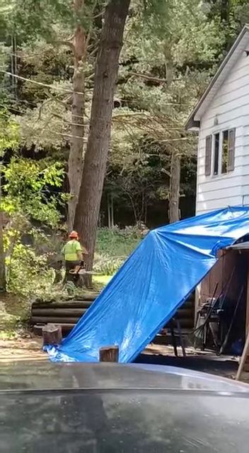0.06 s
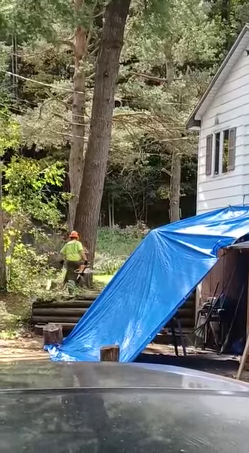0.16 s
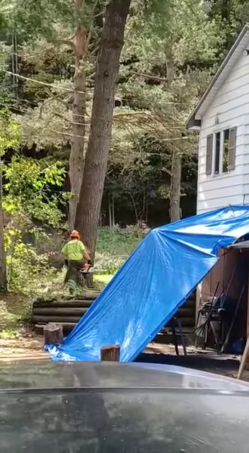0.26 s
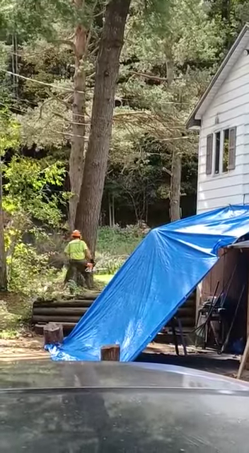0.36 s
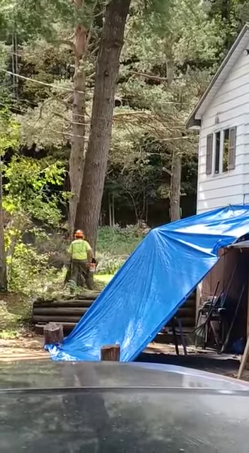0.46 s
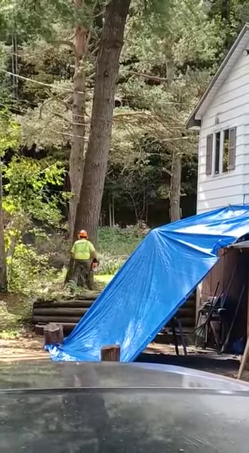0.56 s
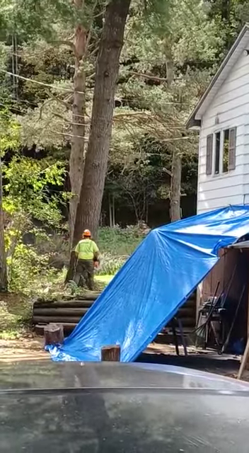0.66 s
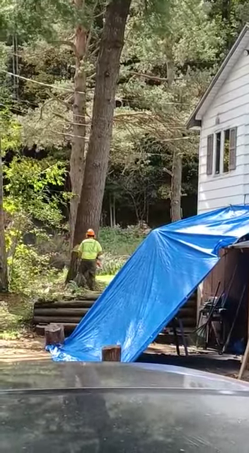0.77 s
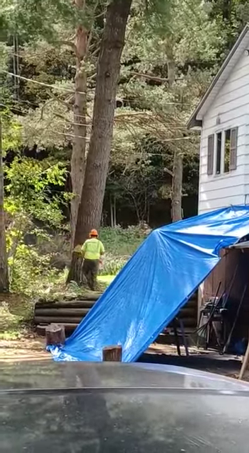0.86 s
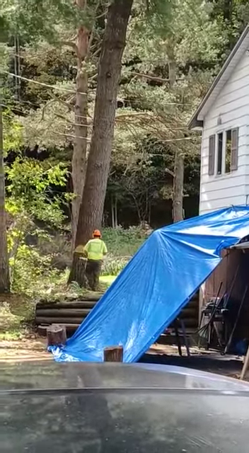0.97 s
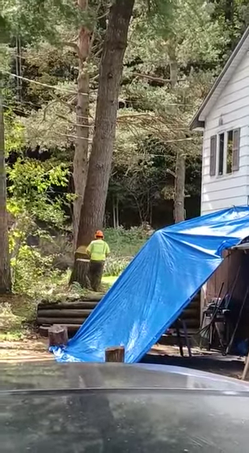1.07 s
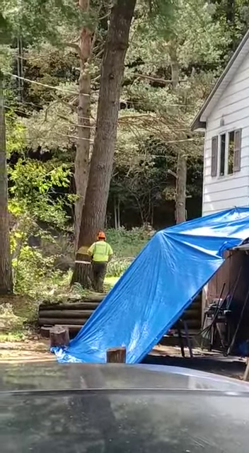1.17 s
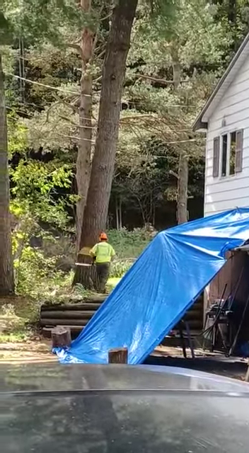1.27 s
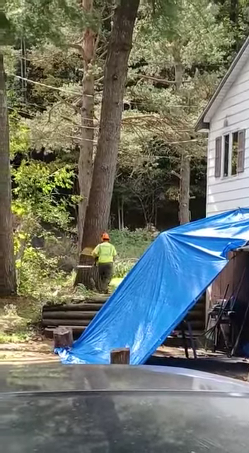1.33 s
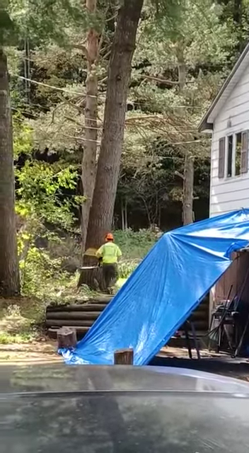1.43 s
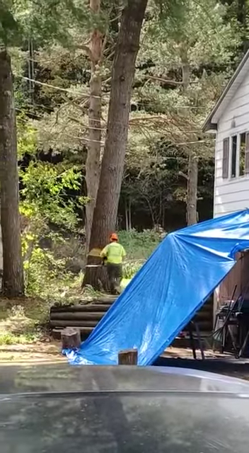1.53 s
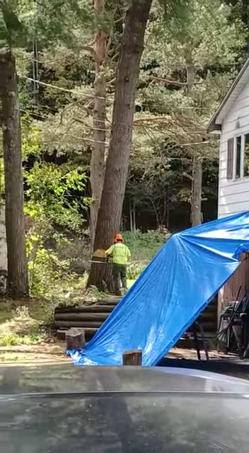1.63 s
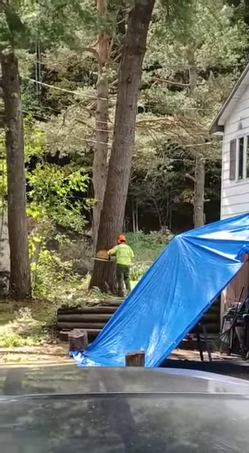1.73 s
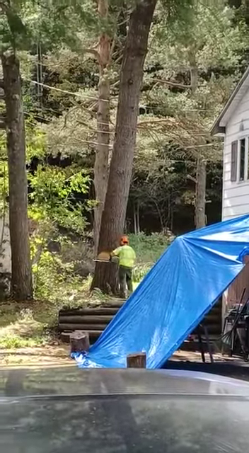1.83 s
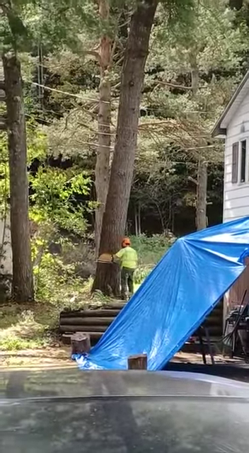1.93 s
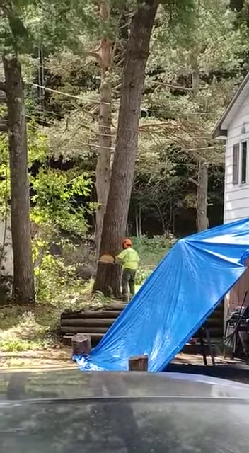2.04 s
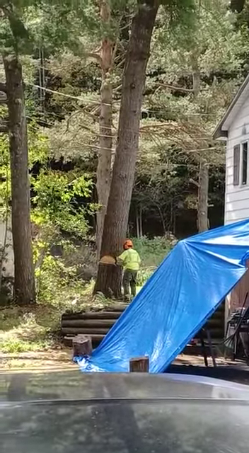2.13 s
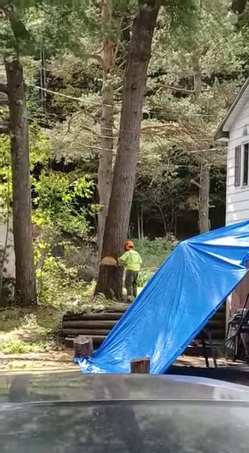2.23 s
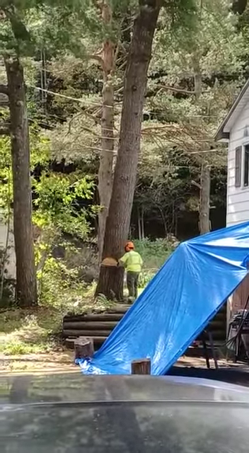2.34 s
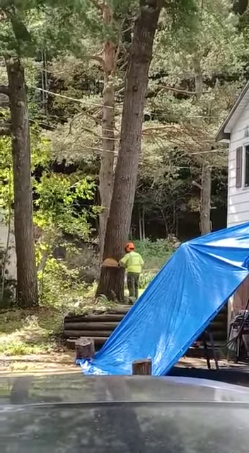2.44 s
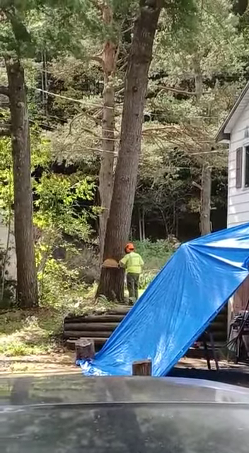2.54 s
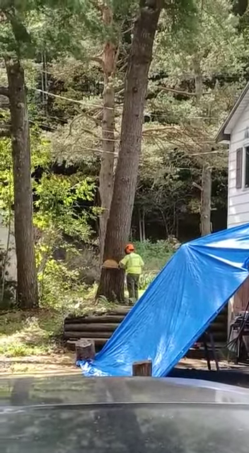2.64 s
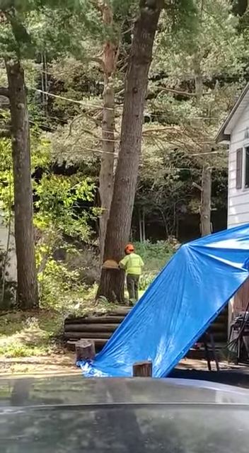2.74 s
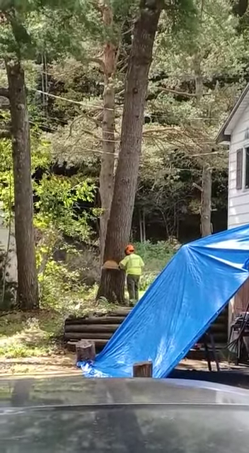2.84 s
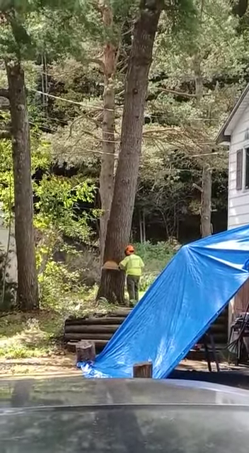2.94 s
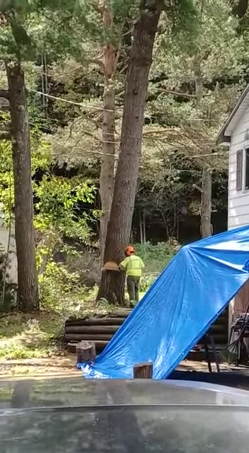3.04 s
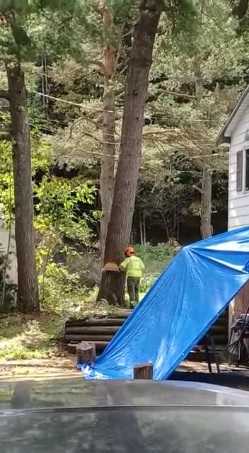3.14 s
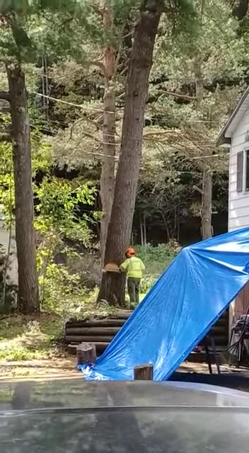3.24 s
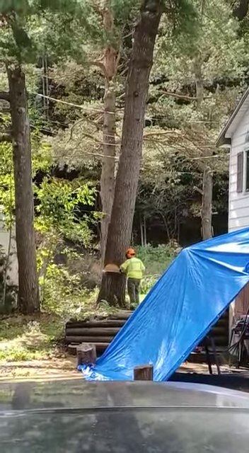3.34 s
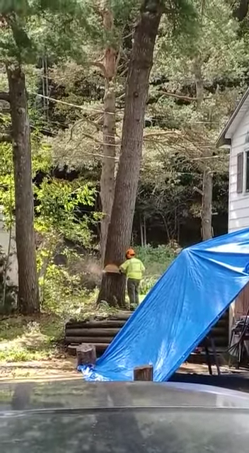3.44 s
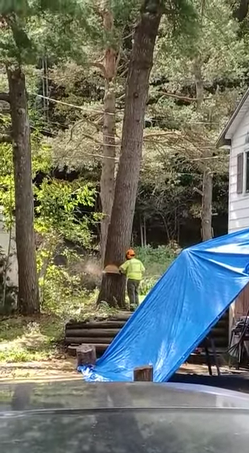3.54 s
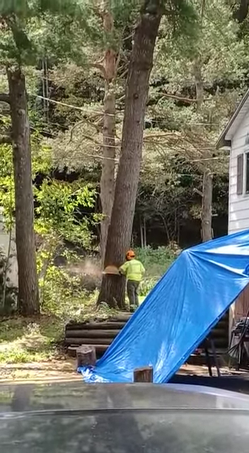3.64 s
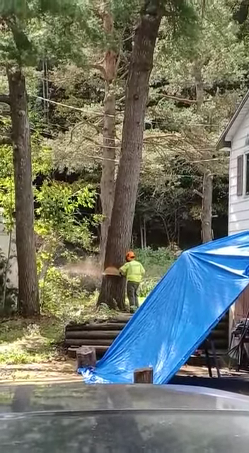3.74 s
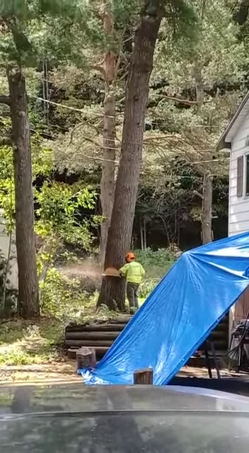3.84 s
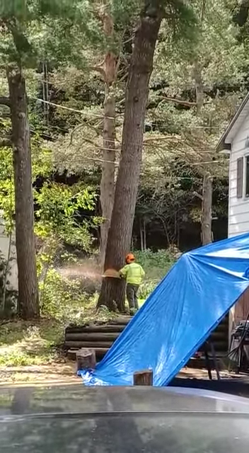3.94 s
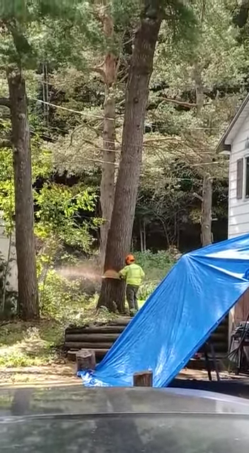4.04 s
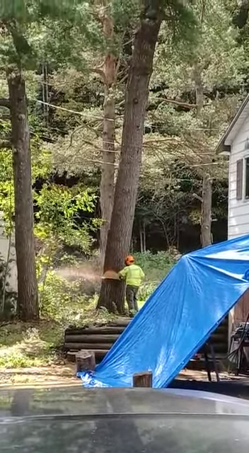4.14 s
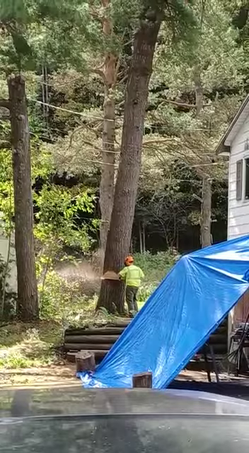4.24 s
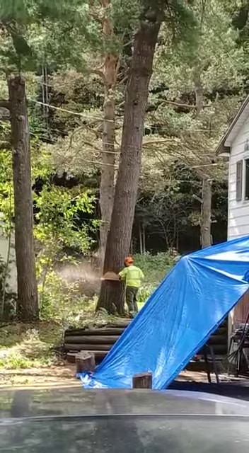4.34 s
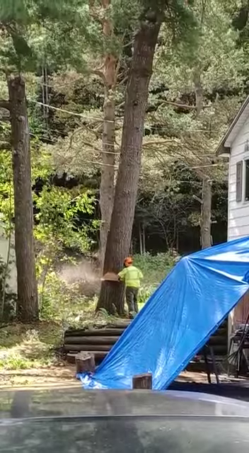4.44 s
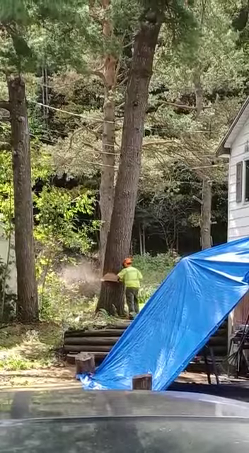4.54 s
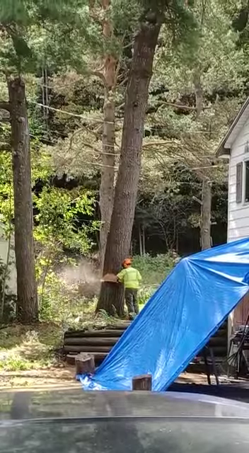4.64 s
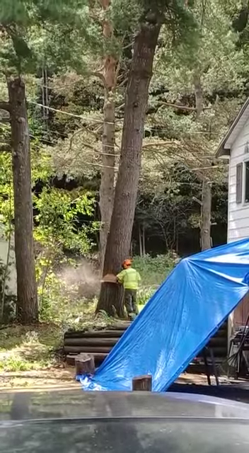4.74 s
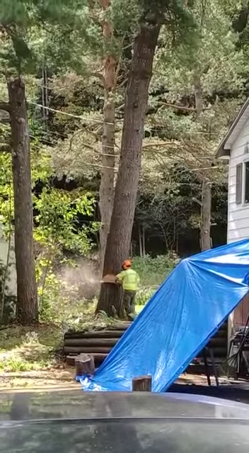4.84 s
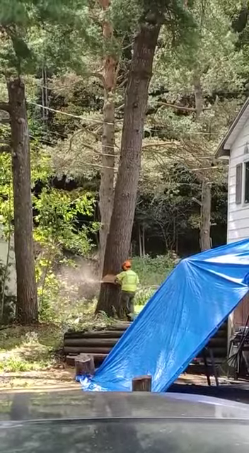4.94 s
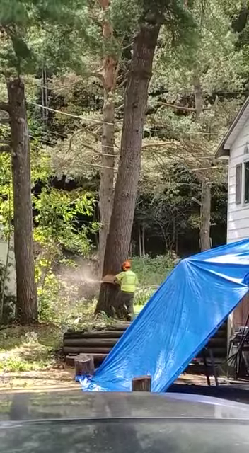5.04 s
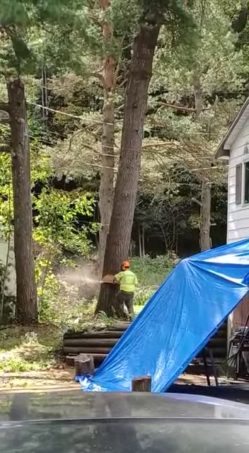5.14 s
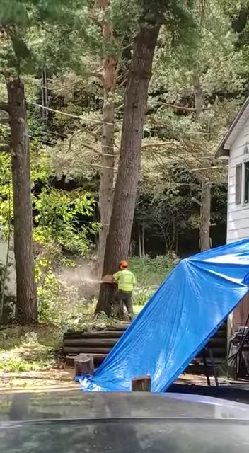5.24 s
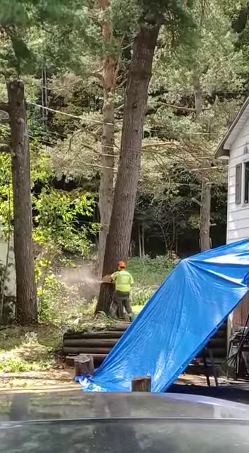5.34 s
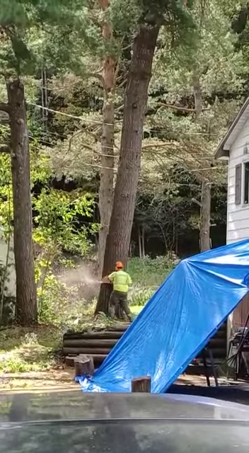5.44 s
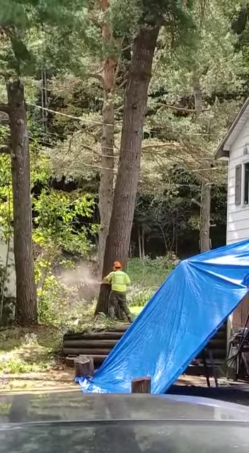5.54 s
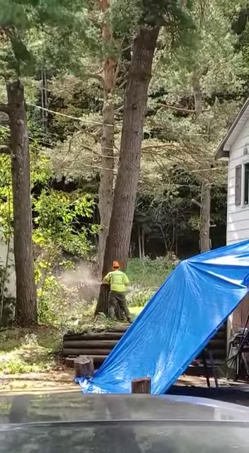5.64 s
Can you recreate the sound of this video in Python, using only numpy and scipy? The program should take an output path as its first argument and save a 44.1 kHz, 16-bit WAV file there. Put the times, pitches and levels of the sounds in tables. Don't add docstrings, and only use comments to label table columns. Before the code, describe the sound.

A chainsaw some way off outdoors ticks over unevenly, barks through four quick revs, then howls at full throttle as it cuts into a trunk.

```python
import sys
import numpy as np
from scipy import signal
from scipy.fft import rfft, irfft, next_fast_len
from scipy.io import wavfile
from scipy.ndimage import uniform_filter1d, map_coordinates

SR = 44100
rng = np.random.default_rng(int(sys.argv[2]) if len(sys.argv) > 2 else 0)


def pcm_store(signal):
    levels = np.round(np.clip(np.atleast_2d(signal), -1, 1) * 32767)
    wavfile.write(sys.argv[1], SR, levels.astype(np.int16).T)


def undo_db(level):
    steps = np.asarray(level, float) / 20
    return 10 ** steps


N = 251356


def running():
    speed, gas, effort_db = trigger()
    slow = np.clip((170 - speed) / 80, 0, 1)
    crawl = np.clip((88 - speed) / 25, 0, 1)
    turn = np.cumsum(speed * (1 + .001 * wobble(40)) * (throttle() > 0)) / SR - .27
    loose = turn + (.002 + .0055 * slow) * wobble(70)
    gate = undo_db(0.37 * wobble(45))
    puffs = gate * once_a_turn(loose, depth=0.14 + 0.15 * slow + .25 * crawl)
    blows = exhaust_blows(loose, slow)
    shaking = shared(blows) + (.36 + .25 * slow) * puffs * rng.standard_normal((2, N))
    pull_up = np.clip(np.gradient(speed) * SR / 250, 0, 1)
    bark_db = -31.5 + 0.74 * (effort_db + 28.5) - 3.6 * (1 - gas) + 1.14 * pull_up + 1.2 * wobble(6)
    tone = low_orders(turn, speed, gas, slow) + chain_whine(turn, speed, gas)
    tone = tone + muffler(blows, bark_db - 3.5 + .5 * slow)
    rough = roar(puffs, shaking, effort_db, slow) + sputter(puffs, bark_db - 16.5 + 6 * slow)
    bar = guide_bar(shaking, slow, effort_db - 15.5 - 5.3 * (1 - gas))
    hiss_db = -34.9 + 1.08 * (effort_db + 28) + 0.8 * (1 - gas)
    hiss = undo_db(hiss_db) * noise(HISS, gate * once_a_turn(loose, depth=0.16 + 0.75 * crawl))
    return throttle() * (shared(tone) + rough + bar + hiss)


# pulled_s, let_go_s, speed_at_pull [turns per s], speed_at_top [turns per s]
BLIPS = [
    (2.149, 2.282, 67, 91),
    (2.383, 2.506, 84, 130),
    (2.686, 2.786, 103, 129),
    (2.925, 3.035, 106, 129),
]
# start_s, speed [turns per s]
PICK_UP = (2.25, 77)
# start_s, speed [turns per s], effort_db
CLIMB = [
    (3.16, 113.0, -31),
    (3.246, 135.4, -28),
    (3.338, 159.3, -25),
    (3.436, 170.7, -25),
    (3.53, 188.4, -25),
    (3.6, 194.3, -26),
]
# start_s, speed [turns per s], effort_db
CUT = [
    (3.66, 194.7, -27),
    (4.02, 184.4, -27),
    (4.39, 195.6, -28),
    (4.53, 196.8, -27),
    (4.95, 221.8, -27),
    (5.16, 222.4, -27),
    (5.3, 215.4, -28),
    (5.4, 219.8, -27),
    (5.7, 204.6, -31),
]


def trigger():
    pulled, let_go, low, top = np.transpose(BLIPS)
    run_on_s, opens_s, shuts_s = .018, 0.028, 0.021
    corners = sorted([*zip(pulled, low), *zip(let_go + run_on_s, top), PICK_UP])
    corners = corners + [row[:2] for row in CLIMB + CUT]
    speed = uniform_filter1d(curves(corners)[0], size=1500)
    t = np.arange(N) / SR
    held_s = CLIMB[0][0]
    on = np.append(pulled, held_s)[:, None]
    off = np.append(let_go, 2 * N / SR)[:, None]
    opening = np.clip((t - on) / opens_s, 0, 1)
    shutting = np.clip(1 - (t - off) / shuts_s, 0, 1)
    gas = (opening * shutting).max(0)
    gas[t < pulled[0] + opens_s] = 1
    free_db = -30 + 12 * np.log2(np.maximum(speed, 82) / 125) + 2 * gas
    return speed, gas, np.where(t < held_s, free_db, curves(CLIMB + CUT)[1] + 0.94)


def throttle():
    return np.clip((np.arange(N) / SR - BLIPS[0][0]) / 0.0044 - 2, 0, 1)


# pitch_hz, level_db
ORDERS_1_TO_4 = [
    [(75, -41.5), (115, -21.5), (138, -23.5), (151, -36), (170, -24.5), (184, -28), (195, -21), (222, -22)],
    [(140, -42.5), (240, -33), (280, -41.5), (340, -31.5), (372, -26), (388, -32.5), (402, -28),
     (442, -22.5)],
    [(200, -34), (230, -31.5), (280, -48.5), (390, -46.5), (435, -29), (500, -38.5), (590, -46), (650, -43)],
    [(280, -61), (440, -35.5), (520, -44.5), (640, -33), (740, -33), (785, -37.5), (835, -27.5), (885, -39)],
]


def low_orders(turn, speed, gas, slow):
    bog_db = 7 * np.clip((np.arange(N) / SR - 5.39) / 0.2, 0, 1)
    tone = 0
    for k, law in enumerate(ORDERS_1_TO_4):
        level_db = along(law, (k + 1) * speed) - 8.5 * (1 - gas) - bog_db * (k == 1) + 3.0
        flutter_db = (k ** .5 + 1.5 * slow) * wobble(12)
        tone = tone + undo_db(level_db + flutter_db) * np.sin(2 * np.pi * (k + 1) * turn - 2.13 * k)
    return tone


def exhaust_blows(loose, slow):
    blows = pulses(loose, count=38) - pulses(loose, count=4)
    blows = throttle() * blows * undo_db(1.2 * slow * wobble(60))
    return unit(patchy(blows, depth_db=2.2, smear=.011))


# pitch_hz, width_hz, level_db
MUFFLER = [(429, 31, 12), (685, 64, 3), (823, 76, 4), (968, 166, 2.5), (1115, 225, 2.5), (1360, 200, -13.5),
           (1537, 34, -3)]


def muffler(blows, level_db):
    return undo_db(level_db) * unit(filtered(blows, resonant(MUFFLER)))


# pitch_hz, level_db (per Hz)
ROAR = [(40, -31), (100, 0.5), (300, -5), (600, -18), (1100, -1.5), (1800, -6.5), (2300, 0), (2550, -2),
        (4200, 2), (6000, -3), (8000, -10.5), (9000, -54)]
# pitch_hz, width_hz, level_db
COVER = [(1280, 70, -16), (1880, 227, -8), (2536, 92, -1), (2866, 183, -4), (3496, 110, -1.5),
         (4980, 850, -5)]


def roar(puffs, shaking, effort_db, slow):
    rush = noise(ROAR, puffs)
    bass = filtered(rush, lambda hz: 1 / (1 + (hz / 620) ** 6))
    rush = rush - .7 * (1 - np.clip(3 * slow, 0, 1)) * bass
    cover = unit(filtered(shaking, resonant(COVER)))
    return undo_db(effort_db - 3.5) * rush + undo_db(effort_db - 7.5) * cover


# pitch_hz, width_hz, level_db
SLACK_BAR = [(3730, 45, 14), (3440, 96, -16)]
# pitch_hz, width_hz, level_db
BAR = [(4140, 140, -1.5), (4353, 105, 7.5), (4860, 1600, -4.5)]


def guide_bar(shaking, slow, level_db):
    slack = np.clip(1.5 * slow, 0, 1)
    loose_ring = unit(filtered(shaking, resonant(SLACK_BAR)))
    tight_ring = unit(filtered(shaking, resonant(BAR)))
    return undo_db(level_db) * (slack * loose_ring + (1 - slack) * tight_ring)


# pitch_hz, level_db
WHINE = [(1800, -55), (2300, -37), (2480, -35), (2620, -42), (2800, -32.5), (2950, -46), (3100, -43)]


def chain_whine(turn, speed, gas):
    level_db = along(WHINE, 14 * speed) - .6 * 8.5 * (1 - gas) + 3.5 * wobble(7) + 2.5
    return undo_db(level_db) * np.sin(28 * np.pi * turn)


# pitch_hz, level_db (per Hz)
SPUTTER = [(120, -21), (300, -5.5), (450, -4), (1150, -5), (1400, -38), (2200, -51)]


def sputter(puffs, level_db):
    return undo_db(level_db) * noise(SPUTTER, puffs)


# start_s, speed [turns per s], pumping_db,
# muffler_facing_db, panels_facing_db
IDLE = [
    (0, 55, -50, 6, 2.2),
    (.36, 58.5, -49, 7, -3),
    (.48, 58, -56, 0, -2.2),
    (.75, 57.5, -53, 9.5, 0),
    (.95, 57.5, -49, 5, -1.1),
    (1.16, 58, -55, 0, 2.2),
    (1.3, 63, -46.5, -1.5, 3.5),
    (1.75, 63, -46.5, -1.1, 4.5),
    (2.16, 62, -43.5, 0, -2.2),
]
# start_s, peak_db, rattle_over_peak_db
FIRINGS = [(0.078, -48.5, 15), (.132, -48, 12), (0.1884, -43, 10), (.2409, -37.5, 7), (.2934, -39.5, 9.5),
           (0.3624, -28.5, -0.8), (0.443, -37.5, 0), (0.462, -39.5, 6.5), (.5432, -38, 4), (.6265, -44, 0),
           (.6774, -51, 9.5), (.9248, -44, -12), (1.0271, -49, 9), (1.1492, -41, 1.1), (1.233, -38, -1),
           (1.3224, -30.5, -6), (1.3877, -39, -10), (1.4183, -32.5, -0.5), (1.5186, -34, -0.5),
           (1.6012, -35, 0), (1.684, -35, 1), (1.752, -36, 0.5), (1.817, -31.5, -4), (1.9131, -30.5, -1),
           (2.0118, -31, -2.5), (2.108, -35, 4)]
# pitch_hz, level_db (per Hz)
CASING = [(35, -53), (60, -9.5), (226, -2), (298, -6), (559, -14.5), (756, -11), (1200, -17.5),
          (2310, -13.5), (2590, -12.5), (6410, -20.5), (7370, -28.5), (7900, -32), (8870, -36),
          (12000, -30), (15500, -50)]
# pitch_hz, width_hz, level_db
PANELS = [(2586, 53, 11.5), (2860, 120, 2), (2850, 210, 9), (4180, 220, 3), (5210, 260, -0.5),
          (6370, 110, -15), (10450, 180, -14), (860, 190, -3), (1600, 140, -3)]
# pitch_hz, width_hz, level_db
THUD = [(117, 60, 8), (204, 72, 9.5), (363, 180, -7)]
# pitch_hz, level_db (per Hz)
HISS = [(4940, -66), (8400, -13.5), (10700, -1), (11300, 0), (15100, -12), (15800, -5)]


def tick_over():
    speed, pump_db, facing_db, panel_db = curves(IDLE)
    catches = [(s - .015, db - 2.5, rattle) for s, db, rattle in FIRINGS if s > 1.65]
    s, db, clank_db = np.transpose(FIRINGS + catches)
    strength_db = db + clank_db

    kick = bursts(s, 0 * db, rise=0.009, fall=.035)
    lumps = np.array([row[0] for row in FIRINGS if row[0] > 1.2 and row[1] > -39])
    gasp_s = lumps + .024
    sag = .2 * bursts(lumps + .012, 0 * lumps, rise=.028, fall=.008)
    turn = np.cumsum(speed * (1 + .02 * (kick - kick[:2 * SR].mean()) - sag)) / SR
    pump_db = pump_db - 12 * bursts(gasp_s, 0 * lumps, rise=0.0064, fall=0.015)

    pump = undo_db(pump_db - facing_db + 3.0 + 2.4 * wobble(24.0)) * np.sin(4 * np.pi * turn)
    pump = pump + undo_db(pump_db + facing_db + 6.0 + 1.9 * wobble(23.26)) * np.sin(8 * np.pi * turn)
    high_db = 5.6 * (pump_db + 44) - 3 * facing_db - 51
    for k in range(5, 10):
        pump = pump + undo_db(high_db + 5.2 * wobble(25.2)) * np.sin(2 * np.pi * k * turn)

    gate = once_a_turn(turn, depth=0.25) * undo_db(0.79 * wobble(29.84))
    rattle = undo_db(-41.5 + 0.32 * (pump_db + 50.5)) * noise(CASING, gate)
    rattle = rattle + undo_db(-47 + panel_db + 1.7 * wobble(4.36)) * ringing(PANELS, gate)
    clank = bursts(s, strength_db - 4, rise=0.002, fall=0.013) * ringing(PANELS, gate)
    crack = bursts(s, strength_db - 3.5, rise=0.0016, fall=0.0044) * noise(ROAR)
    spit = bursts(s, db - 16.5, rise=0.0027, fall=0.015)
    spit = spit + bursts(s, db - 12.5, rise=0.0017, fall=0.0027)
    spit = spit * noise(HISS, gate)
    cough = bursts(s, 0.24 * (strength_db + 32), rise=0.0097, fall=.015) * ringing(THUD, 1)[0]
    cough = undo_db(pump_db + facing_db + 4) * cough
    return (1 - throttle()) * (shared(pump + cough) + rattle + clank + crack + spit)


# pitch_hz, fade_by_60_db_s
YARD = [(100, 0.76), (1000, 0.48), (5000, 0.08), (12000, 0.29)]


def yard(x):
    hz, t, z = signal.stft(rng.standard_normal((2, SR // 2)), SR, nperseg=256)
    fade = undo_db(-60 * t / along(YARD, hz)[:, None])
    tail = signal.istft(z * fade, SR, nperseg=256)[1]
    late = np.pad(x, (700, 0))[None]
    return signal.fftconvolve(late, tail / np.linalg.norm(tail[0]), axes=1)[:, :N]


# pitch_hz, left_minus_right_db
LEAN = [(60, -1.0), (92, -1.5), (140, -1.5), (210, -3), (330, 0.5), (500, 4.5), (770, -1.5), (1170, 0),
        (1790, -1), (2740, -3), (4190, -9), (6410, -3.5), (9810, -14), (15000, -19.5)]
# pitch_hz, likeness (0 to 1)
ALIKE = [(30, .6), (80, 1), (250, .96), (500, .9), (1000, .84), (2000, .76), (4000, .72), (8000, .55),
         (15000, .52)]
# pitch_hz, lead_radians
LEAD = [(60, -.06), (200, -.2), (600, -.6), (1720, -1), (3190, -1.6), (4390, -1.5), (5770, -1.9),
        (7150, -1.6), (7580, -3.2), (12200, -2.8), (15800, -3.7)]


def ports(pair):
    def spread(hz):
        angle = np.arccos(np.clip(along(ALIKE, hz), -1, 1)) / 2
        return np.array([np.cos(angle), np.sin(angle)])

    def lean(hz):
        half = undo_db(along(LEAN, hz) / 2) * np.exp(.5j * along(LEAD, hz))
        return np.array([half, 1 / half]) * 2 / abs(half + 1 / half)

    mid, side = filtered(pair, spread)
    return filtered(np.array([mid + side, mid - side]), lean)


def once_a_turn(turn, depth):
    return 1 - depth + depth * np.exp(-3 * (turn % 1)) * 3


def pulses(turn, count):
    u = np.pi * (turn % 1) + 1e-7
    return np.sin((2 * count + 1) * u) / np.sin(u) / 2 - .5


def patchy(x, depth_db, smear):
    hz, _, z = signal.stft(x, SR, nperseg=1024)
    field = uniform_filter1d(rng.standard_normal(z.shape), size=5, axis=0)
    field = uniform_filter1d(field, size=14, axis=1)
    lag = np.cumsum(smear * rng.uniform(0, 1, len(z))) * 2 * np.pi * SR / 1024
    moved = signal.istft(z * undo_db(depth_db * unit(field)), nperseg=1024)[1][:N]
    return filtered(moved, lambda f: np.exp(-1j * np.interp(f, hz, lag)))


def bursts(s, db, rise, fall):
    t = np.arange(int(BLIPS[0][0] * SR + 900)) / SR - s[:, None]
    swell = np.exp(np.where(t < 0, t / rise, -t / fall))
    shape = (undo_db(db)[:, None] * swell).sum(0)
    return np.pad(shape, (0, N - len(shape)))


def noise(spectrum, gate=1):
    return unit(filtered(gate * rng.standard_normal((2, N)), lambda hz: undo_db(along(spectrum, hz))))


def ringing(modes, gate):
    return unit(filtered(gate * rng.standard_normal((2, N)), resonant(modes)))


def resonant(modes):
    def response(f):
        total = 0
        for k, (centre, width, db) in enumerate(modes):
            loss = 1j * f * width
            total = total + (-1) ** k * undo_db(db) * loss / (centre * centre - f * f + loss)
        return total
    return response


def filtered(x, response):
    m = next_fast_len(N + SR // 2)
    return irfft(rfft(x, m) * response(np.fft.rfftfreq(m, 1 / SR)), m)[..., :N]


def shared(x):
    return x * np.array([[1], [0]])


def unit(x):
    return x / np.sqrt(np.mean(x ** 2) + 1e-20)


def along(points, hz):
    f, v = np.transpose(points)
    return np.interp(np.log(hz + 1), np.log(f + 1), v)


def curves(rows):
    s, *cols = np.transpose(rows)
    return [np.interp(np.arange(N) / SR, s, c) for c in cols]


def wobble(rate):
    knots = rng.standard_normal(int(N * rate / SR) + 4)
    return map_coordinates(knots, [np.arange(N) * rate / SR])


def scene():
    saw = tick_over() + running()
    scattered = filtered(saw[0], lambda hz: 1 / (1 + (600 / (hz + 1)) ** 2))
    return ports(saw + undo_db(-7.5) * yard(scattered))


def roll_off(x):
    return signal.sosfilt(signal.butter(12, 16270, fs=SR, output="sos"), x)


def record(dry):
    def kept(hz):
        return np.where((hz > 7400) & (hz < 8300), undo_db(-19), 1) * (hz < 15790)

    return roll_off(filtered(dry, kept))


dry = scene()
out = record(dry)
pcm_store(out)
```